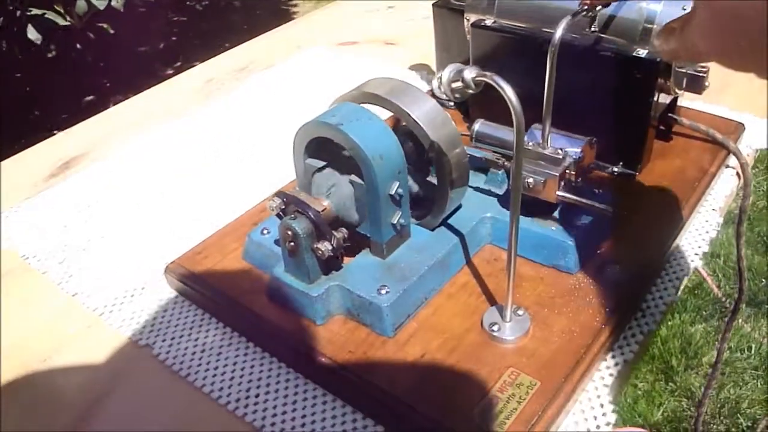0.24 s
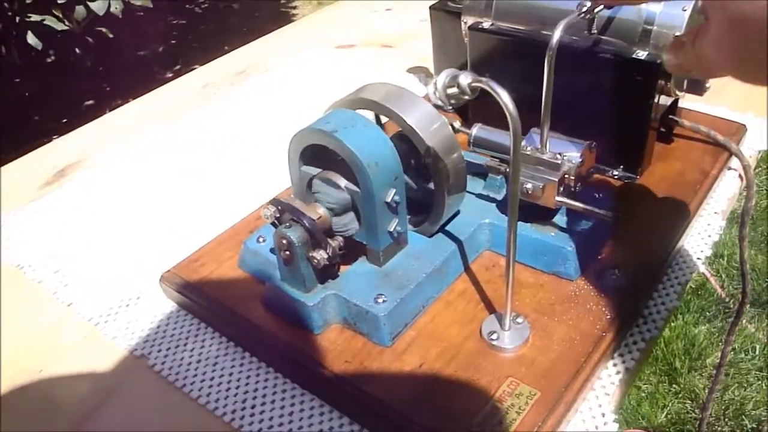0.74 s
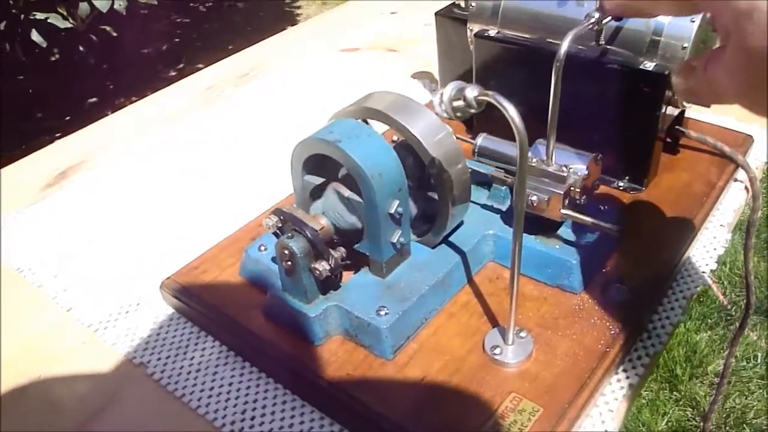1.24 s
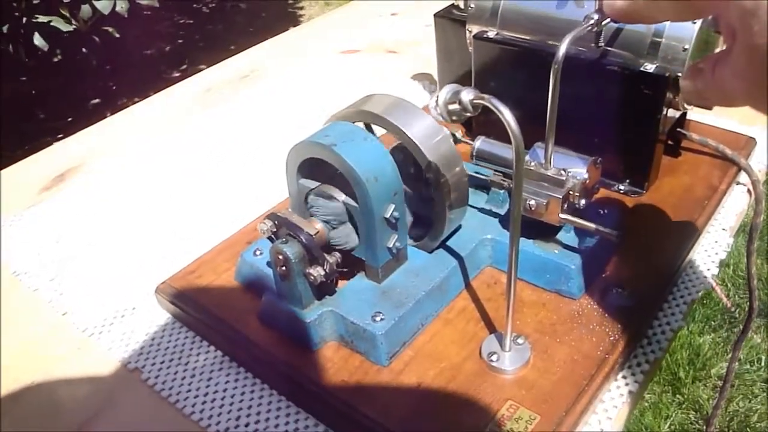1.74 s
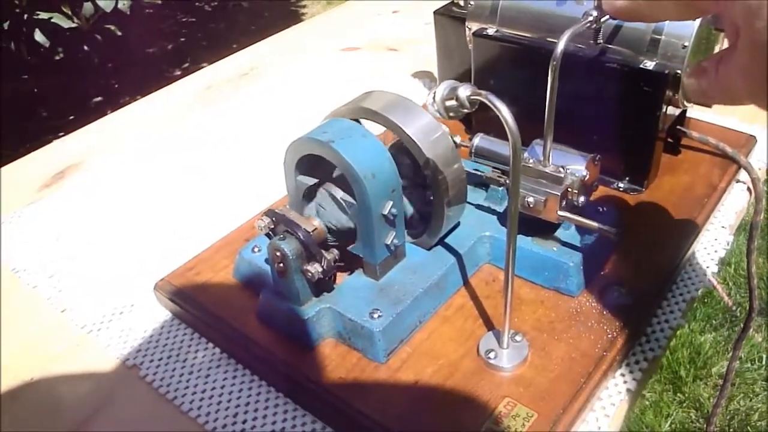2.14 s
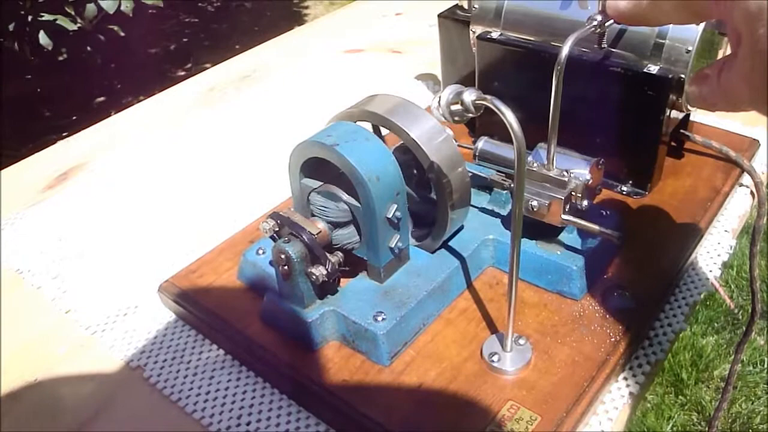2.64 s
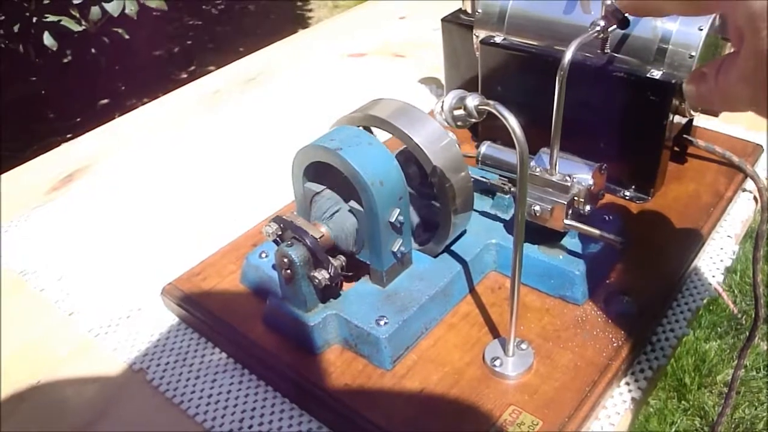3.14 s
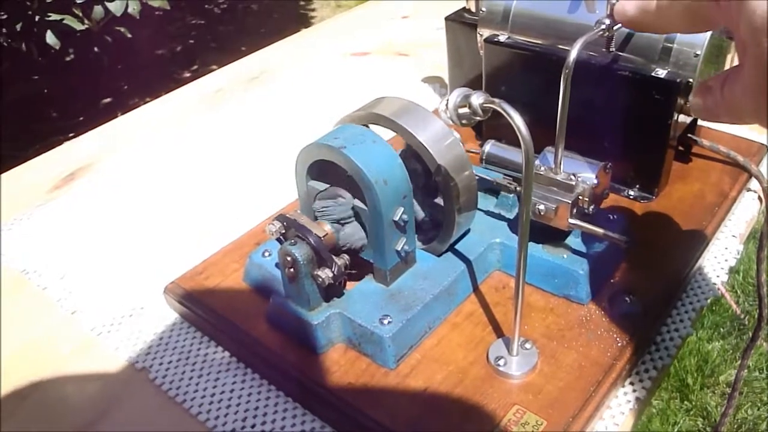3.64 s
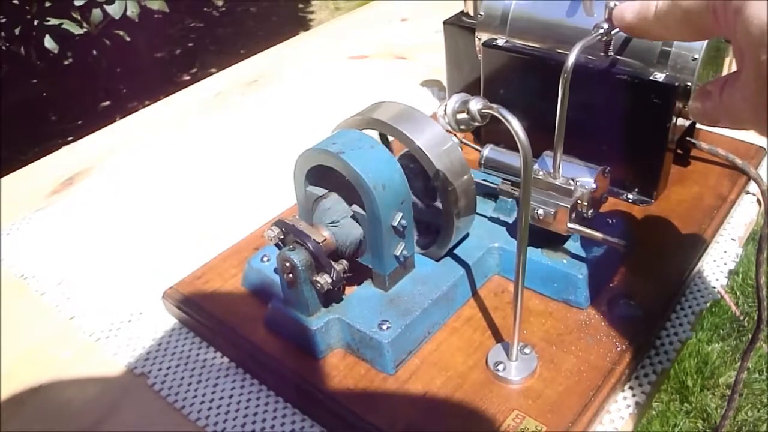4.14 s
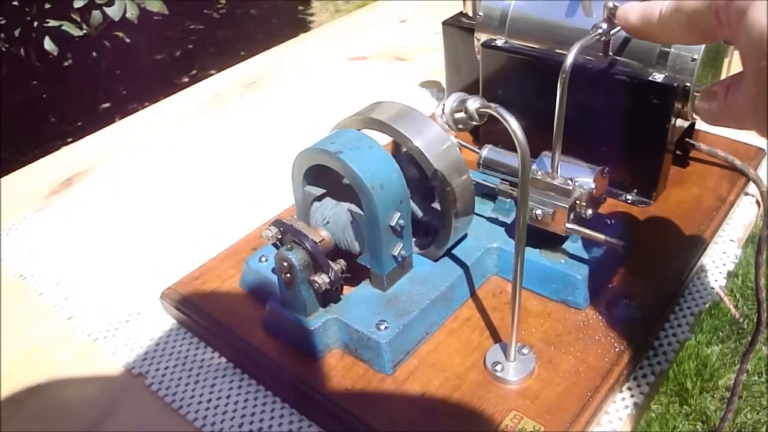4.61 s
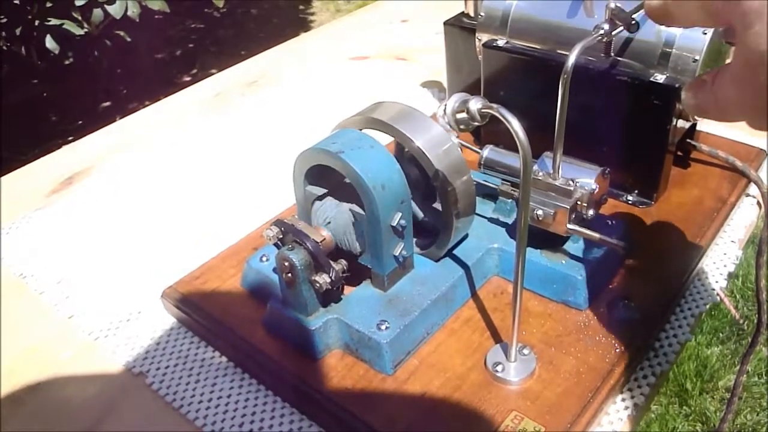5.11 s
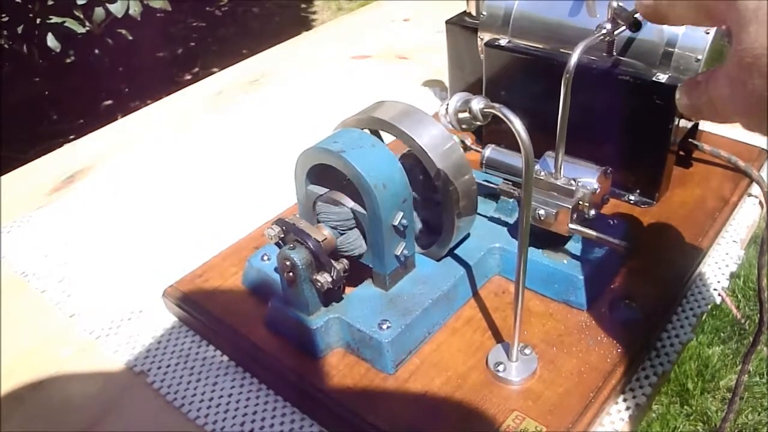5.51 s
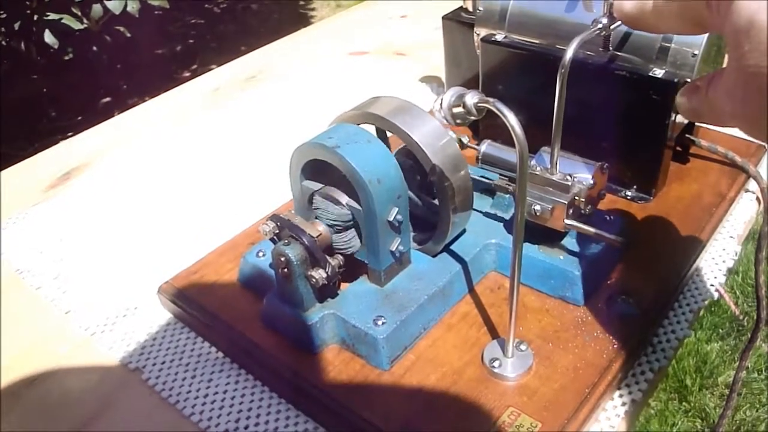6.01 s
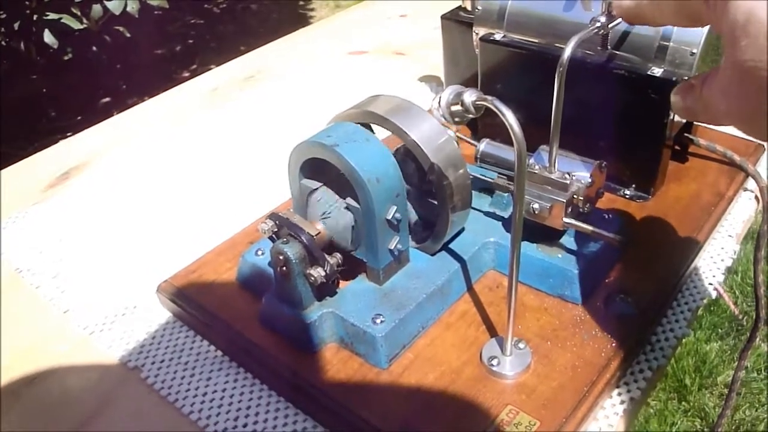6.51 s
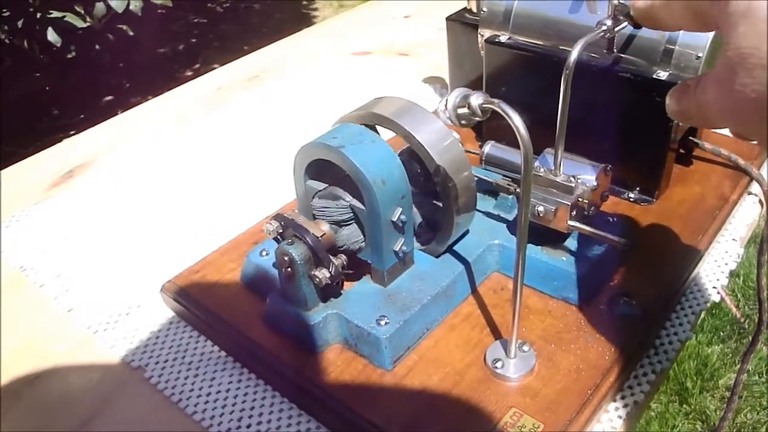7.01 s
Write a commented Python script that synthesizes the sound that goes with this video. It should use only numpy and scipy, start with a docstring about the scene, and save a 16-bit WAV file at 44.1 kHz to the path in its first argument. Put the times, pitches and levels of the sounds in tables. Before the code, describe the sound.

A small steam engine on a wooden board clatters fast with spitting exhaust puffs, then slows to separate knocks outdoors, ending in wind buffets.

```python
"""Outdoors, on a wooden board, a small double-acting steam engine runs down as the steam is shut off.
Two puffs a turn, each a spit and a blow-down, excite resonances of the exhaust pipe as shaped noise.
Slack in crank and valve gear knocks into the cast frame and board, heard as decaying modes.
Shaft and dynamo rumble over an outdoor wash, a boiler simmer and a far drone, all filtered noise.
A few wind buffets strike the microphone early on, and gusts with more buffets come at the end."""
import sys
import numpy as np
from scipy import signal
from scipy.fft import rfft, irfft
from scipy.io import wavfile

SR = 44100
rng = np.random.default_rng(int(sys.argv[2]) if len(sys.argv) > 2 else 0)


def wav_record(signal):
    """Record a signal, one row per channel, as 16-bit PCM in the file named by sys.argv[1]."""
    frames = np.transpose(np.atleast_2d(signal))
    bounded = np.clip(frames, -1, 1)
    # unit amplitude maps onto the largest positive 16-bit level
    quanta = np.round(bounded * 32767).astype(np.int16)
    wavfile.write(sys.argv[1], SR, quanta)


N = 320166  # samples
TIME = np.arange(N) / SR  # seconds


def amp(db):
    """Logarithmic level: decibels to an amplitude ratio."""
    return 10 ** (np.asarray(db) / 20)


def evened(x):
    """Normalisation to a root mean square of 1."""
    return x / np.sqrt(np.mean(x ** 2) + 1e-20)


def curve(rows):
    """Envelope: gain interpolated in decibels between the rows of a level table."""
    seconds, db = np.transpose(rows)
    return amp(np.interp(TIME, seconds, db))


def row_at(rows, s):
    """Linear interpolation: the columns of a control table at one moment."""
    times, *columns = np.transpose(rows)
    return np.array([np.interp(s, times, column) for column in columns])


def add(mix, s, sound):
    """Superposition: adds a sound to the mix from s seconds on."""
    part = mix[max(round(s * SR), 0):][:len(sound)]
    part += sound[:len(part)]


def coloured(gain):
    """Spectral shaping: noise of rms 1 with the given gain(Hz)."""
    spectrum = rfft(rng.standard_normal(N))
    return evened(irfft(spectrum * gain(np.fft.rfftfreq(N, 1 / SR)), N))


def shaped(points):
    """Spectral shaping: noise with a spectrum table, interpolated over log frequency."""
    hz, db = np.transpose(points)
    return coloured(lambda f: amp(np.interp(np.log(f + 1), np.log(hz + 1), db)))


def pipe(modes):
    """Resonance: noise through a sum of steep peaks."""
    return coloured(lambda f: sum(amp(db) / (1 + (2 * (f - hz) / width) ** 2) for hz, width, db in modes))


def flutter(hz, depth_db):
    """Amplitude modulation: random level changes, mostly below hz, with an rms of depth_db."""
    return amp(depth_db * coloured(lambda f: 1 / (1 + (f / hz) ** 4)))


def ring(modes, t):
    """Modal decay: a sum of damped sines; every blow lands differently and weights them anew."""
    hz, db, t60 = np.transpose(modes)[:, :, None]
    chance = rng.standard_normal((len(modes), 2))
    hz = hz * (1 + .006 * chance[:, :1])
    db = db + 1.5 * chance[:, 1:]
    x = (amp(db - 60 * t / t60) * np.sin(2 * np.pi * hz * t)).sum(0)
    return x / amp(db).sum()


# Modes of the wooden board, then lower and upper modes of the cast frame, also rung by the knocks.
# Each row: nominal frequency in Hz, relative level in dB, 60 dB decay time in seconds.
BOARD_MODES = [(444, -9.5, 0.038), (544, 1.5, 0.084), (601.6, -1.5, 0.18), (704, -1.5, 0.035)]
FRAME_LOW_MODES = [(744, -12, 0.099), (859, 1.5, 0.083), (888, 3, 0.03), (1026, 1, 0.051),
                   (1070, -11, 0.12), (1170, -10, 0.079)]
FRAME_HIGH_MODES = [(1302.5, -7.5, 0.12), (1386, 2.5, 0.037), (1494, -1.5, 0.084), (1714, -5, 0.046),
                    (1966, -18.5, 0.14), (2042, -1, 0.044), (2992, -7.5, 0.041)]
# Rumble of shaft and dynamo bearings. Each row: time in seconds, relative level in dB.
RUMBLE_LEVEL = [(0, -33), (.44, -52), (1.15, -53), (1.8, -35), (2.1, -45.5), (2.93, -32), (4.5, -38.5),
                (4.95, -36), (6.75, -52)]


def rumble():
    """Forced vibration: bearing roughness keeps the board and frame modes humming."""
    all_modes = BOARD_MODES + FRAME_LOW_MODES + FRAME_HIGH_MODES
    modes = [(hz, 4.3 / t60, db) for hz, db, t60 in all_modes]  # fast decay gives a wide peak

    def response(f):
        power = sum(amp(2 * db) / (1 + (2 * (f - hz) / width) ** 2) for hz, width, db in modes)
        return np.sqrt(power) * f / (f + 600)

    return curve(RUMBLE_LEVEL) * amp(-8) * flutter(40, 3.5) * coloured(response)


# Spectrum of open air and boiler simmer. Each row: frequency in Hz, relative density in dB per Hz.
AIR_SPECTRUM = [(260, -18), (450, -6.5), (700, -2.5), (830, 1.5), (1150, -5.5), (1700, -10), (3200, -10),
                (3850, -16), (4600, -14), (5300, -15.5), (5750, -18), (6400, -12), (8500, -17.5),
                (11000, -16)]
# Its course. Each row: time in seconds, relative level in dB.
WASH_LEVEL = [(0, -31), (.28, -34.5), (1.9, -33), (3.74, -35.5), (4.55, -33.5), (7.26, -35.5)]
# Spectrum of a distant low drone. Each row: frequency in Hz, relative density in dB per Hz.
DRONE_SPECTRUM = [(18, -51), (30, -14), (96, -10.5), (172, -9.5), (208, -4.5), (328, -6.5), (450, -9),
                  (580, -23), (990, -120)]
# A faint wavering hum. Each row: frequency in Hz, width in Hz, level in dB on the drone's level curve.
HUM_BANDS = [(100.3, 15, -6.5), (211, 15, -5)]
# Course of drone and hum. Each row: time in seconds, relative level in dB.
DRONE_LEVEL = [(0, -62.5), (.5, -70), (1.43, -62), (2.68, -64), (2.9, -58.5), (4.33, -60), (6.5, -60)]


def air():
    """Ambient noise: a near broadband wash, and a far drone with narrow hum bands."""
    wash = amp(-5.0) * curve(WASH_LEVEL) * flutter(8.7, 0.94) * shaped(AIR_SPECTRUM)
    hum = sum(amp(db) * pipe([(hz, width, 0)]) for hz, width, db in HUM_BANDS)
    drone = amp(5.0) * shaped(DRONE_SPECTRUM)
    return wash + curve(DRONE_LEVEL) * flutter(1.8, 1.4) * (drone + hum)


START_TURN = -.251  # crank angle at 0 s, in turns
# Crank speed. Each row: time in seconds, speed in turns per second.
CRANK_SPEED = [(0, 17.825), (.6, 16.285), (1.3, 13.898), (2.1, 11.846), (3, 10.261), (3.8, 9.261),
               (4.55, 8.77), (5.2, 7.286), (5.9, 5.712), (6.6, 3.294), (7.26, 2.25)]


def crank():
    """Kinematics: speed integrates to the crank angle in turns at every sample."""
    return START_TURN + np.cumsum(np.interp(TIME, *np.transpose(CRANK_SPEED))) / SR


# The two cylinder ends. Each row: port shuts at this share of the stroke, spit in the middle pipe
# modes in dB, blow-down in the middle in dB, blow-down in the upper in dB, squeeze before shutting
# in dB; all levels are relative.
CYLINDER_ENDS = [(.66, -5, 0.5, -5, -30), (.84, -12, -24, -5, 3.5)]


def port_power(stroke, end):
    """Gas release: power of spit, blow-down and squeeze at a port over one stroke of given seconds."""
    shut = CYLINDER_ENDS[end][0]
    t = np.arange(0, 1.2 * stroke, 1 / SR)
    share = t / stroke
    spit = ((t / 0.0036) * np.exp(1 - t / 0.0034)) ** 3
    closing = 1 / (1 + np.exp((share - shut) / 0.045))
    blow = np.minimum(t / 0.0019, 1) * amp(-14 * (share - 0.1)) * closing
    squeeze = np.exp(-((share - shut + 0.081) / 0.057) ** 2)  # trapped steam hisses past the valve
    return spit, blow, squeeze


# Exhaust pipe modes, lower, middle and upper.
# Each row: frequency in Hz, width in Hz, relative level in dB.
PIPE_LOW_MODES = [(5773, 540, 8), (6300, 700, -1)]
PIPE_MID_MODES = [(6680, 200, -9.5), (7130, 610, -4.5)]
PIPE_TOP_MODES = [(9100, 540, -19), (9810, 127, -4.5), (10375, 270, -4), (10835, 180, -2)]
FAR_PORT_TURN, STEAM_TURNS = .526, 66  # turn at which the second port opens; turns under steam
# Exhaust of each cylinder end as the steam falls. Each row: time in seconds, spit in the upper pipe
# modes in dB, spit in the lower in dB, blow-down in dB; all levels are relative.
STEAM_LEVEL = [
    [(0, -32.5, -34, -36.5), (.6, -36, -35.5, -37.5), (1.2, -42, -36, -38), (1.8, -32, -30.5, -37.5),
     (2.5, -35.5, -30, -38.5), (3.3, -29.5, -28, -39), (4.3, -31, -28.5, -40.5), (4.7, -35, -29.5, -42),
     (5, -48, -40, -44.5), (5.9, -55, -40, -53)],
    [(0, -33, -45, -39), (.5, -31, -31, -38.5), (.9, -31.5, -37, -39), (1.3, -29.5, -33, -38.5),
     (2.2, -25.5, -31.5, -40.5), (2.9, -30, -29.5, -40.5), (3.7, -28, -29.5, -43), (4.4, -24, -30.5, -44),
     (4.95, -31, -34.5, -47), (5.6, -29.5, -37, -50), (6, -37, -36, -58)],
]
# Random spread of those three levels from puff to puff, in dB rms.
STEAM_SPREAD_DB = (1.6, .8, .5)


def exhaust():
    """Jet noise in a resonator: the port cracks open with a spit, blows down, then shuts."""
    low, mid, top = power = np.zeros((3, N))
    opening = (np.arange(STEAM_TURNS)[:, None] + [0, FAR_PORT_TURN]).ravel()
    starts = np.interp(opening, crank(), TIME)
    strokes = np.gradient(starts)
    scatter = rng.standard_normal((len(starts), 3)) * STEAM_SPREAD_DB
    for k, (s, stroke) in enumerate(zip(starts, strokes)):
        end = k % 2
        top_db, low_db, blow_db = row_at(STEAM_LEVEL[end], s) + scatter[k]
        _, mid_spit_db, mid_blow_db, top_blow_db, squeeze_db = CYLINDER_ENDS[end]
        spit, blow, squeeze = port_power(stroke, end)
        # levels are doubled because these envelopes are powers
        add(low, s, amp(2 * low_db) * spit + amp(2 * blow_db + 3.0) * blow)
        mid_spit = amp(2 * (low_db + mid_spit_db)) * spit
        add(mid, s + .0015, mid_spit + amp(2 * (blow_db + mid_blow_db)) * blow)
        top_flow = amp(2 * top_blow_db) * blow + amp(2 * squeeze_db) * squeeze
        add(top, s, amp(2 * top_db) * spit + amp(2 * blow_db) * top_flow)
    banks = (PIPE_LOW_MODES, PIPE_MID_MODES, PIPE_TOP_MODES)
    tones = sum(np.sqrt(p) * pipe(modes) * flutter(200, 1.8) for p, modes in zip(power, banks))
    hiss = coloured(lambda f: f / (f + 1500))  # broad, outside the modes
    return tones + amp(-8.5) * np.sqrt(power.sum(0)) * hiss


# Gusts on the microphone. Each row: time in seconds, relative level in dB.
GUST_LEVEL = [(6.5, -61), (6.6, -33.5), (6.636, -54), (6.734, -32), (6.818, -57), (6.906, -38),
              (7.016, -47), (7.068, -44), (7.168, -49.5), (7.26, -47)]
# Single buffets. Each row: start in seconds, relative peak level in dB, nominal frequency in Hz.
WIND_BUFFETS = [(0.021, -44, 104), (0.375, -30.5, 190), (0.609, -42, 299), (6.589, -36, 236),
                (6.675, -28.5, 141), (6.73, -21, 182), (6.775, -34, 168), (6.853, -33, 145),
                (6.897, -27, 151), (6.932, -26, 221), (6.948, -35, 132), (6.965, -28.5, 260),
                (7.054, -35.5, 161), (7.069, -35, 220), (7.103, -36.5, 219), (7.221, -38, 230)]


def wind():
    """Turbulent pressure: lumpy low noise in the gusts, and single buffets of a cycle or two."""
    blowing = np.clip((TIME - GUST_LEVEL[0][0]) / 0.044, 0, 1)
    swings = coloured(lambda f: f ** 2 / (f ** 2 + 90 ** 2) / (1 + (f / 220) ** 2))
    out = amp(-4.5) * curve(GUST_LEVEL) * blowing * flutter(35, 2.5) * swings
    for s, peak_db, hz in WIND_BUFFETS:
        u = np.arange(0, 3 / hz, 1 / SR) * hz  # time in cycles
        # sudden push, slower rebound
        push = np.sin(2 * np.pi * u ** .8) * np.minimum(u / .1, 1) * np.exp(-(u / 1.3) ** 2)
        snap = .5 * np.sin(5 * np.pi * u) * np.exp(-u / 0.29)  # the membrane snaps at the front
        add(out, s, -amp(peak_db) * (push + snap))
    return out


def rattle(shake):
    """Amplitude-modulated noise: loose parts rattle on after a blow."""
    return shake * flutter(270, 2.36) * coloured(lambda f: 1 / (1 + ((f - 1100) / 750) ** 2))


# Knocks of the gear. Each row: time in seconds, relative peak level in dB.
GEAR_KNOCKS = [(.023, -11), (.055, -19.5), (.081, -12), (.113, -19), (.14, -10.5), (.17, -16), (.196, -12),
               (.231, -16.5), (.256, -13), (.289, -19), (.313, -13.5), (.349, -17.5), (.375, -13),
               (.412, -20), (.435, -13), (.47, -17.5), (.497, -11), (.532, -16), (.558, -11), (.591, -13.5),
               (.619, -10.5), (.653, -13.5), (.682, -9), (.717, -13.5), (.748, -9), (.779, -15.5),
               (.811, -14), (.845, -14), (.871, -10), (.909, -13.5), (.94, -7.5), (.977, -14), (1.01, -8.5),
               (1.042, -12.5), (1.074, -7), (1.111, -13), (1.142, -9.5), (1.182, -12.5), (1.213, -8.5),
               (1.25, -13), (1.284, -11.5), (1.321, -12), (1.356, -10), (1.394, -11.5), (1.431, -12.5),
               (1.467, -11), (1.502, -13.5), (1.542, -10), (1.577, -13.5), (1.616, -13), (1.654, -10),
               (1.695, -9.5), (1.729, -9), (1.773, -12), (1.808, -10.5), (1.851, -11), (1.888, -9.5),
               (1.932, -12), (1.97, -12), (2.013, -11), (2.049, -13.5), (2.104, -14.5), (2.134, -15.5),
               (2.178, -16.5), (2.215, -15), (2.245, -19), (2.267, -12.5), (2.302, -16), (2.35, -15.5),
               (2.361, -20.5), (2.421, -29), (2.437, -17.5), (2.448, -18.5), (2.527, -26), (2.539, -12),
               (2.599, -25), (2.615, -15.5), (2.629, -15), (2.693, -26), (2.706, -17), (2.787, -25),
               (2.799, -19), (2.815, -18.5), (2.845, -23), (2.894, -15.5), (2.909, -21), (2.937, -13),
               (2.989, -15), (3.034, -19.5), (3.068, -22), (3.186, -12), (3.288, -13.5), (3.389, -11.5),
               (3.476, -31), (3.489, -8.5), (3.596, -9), (3.679, -30), (3.701, -12.5), (3.808, -10.5),
               (3.853, -23.5), (3.915, -10), (3.961, -20), (4.025, -9.5), (4.073, -20.5), (4.134, -13.5),
               (4.18, -21.5), (4.245, -9), (4.296, -22.5), (4.357, -8), (4.406, -21), (4.472, -13),
               (4.521, -21.5), (4.591, -16), (4.733, -24), (4.784, -13.5), (4.849, -15), (4.911, -7),
               (4.978, -11), (5.045, -6.5), (5.178, -7.5), (5.296, -26), (5.316, -6), (5.362, -24),
               (5.461, -11.5), (5.537, -23), (5.611, -9.5), (5.691, -16.5), (5.764, -12.5), (5.855, -26),
               (5.893, -17.5), (5.965, -11.5), (6.068, -12.5), (6.16, -19), (6.263, -8), (6.329, -29),
               (6.379, -16), (6.439, -28.5), (6.501, -6), (6.653, -20), (6.816, -8.5), (6.899, -26),
               (7.17, -18.5), (7.23, -27.5)]
# Short clack of the parts, lower and upper modes, then the hard edge.
# Each row: nominal frequency in Hz, relative level in dB, 60 dB decay time in seconds.
CLACK_LOW_MODES = [(980, 2, 0.0091)]
CLACK_HIGH_MODES = [(1408, 14.5, 0.0064), (1880, 1, 0.0097), (2162, -3, 0.0087)]
EDGE_MODES = [(2444, 13.5, 0.0025), (2994, 10.5, 0.0072), (3435, -2, 0.02), (3820, -4, 0.0071),
              (4420, -1.5, 0.012), (5050, -0.5, 0.0075)]
# A low board mode, heard only at first. The row: nominal frequency in Hz, 60 dB decay time in
# seconds, level in dB against the thud, last moment in seconds.
BOARD_LOW_MODE = (380, .13, -11, .21)
# Knock colour in the first and second half of the turn. Each row: time in seconds, board thud in dB,
# upper clack and frame in dB, hard edge in dB; all levels are relative.
KNOCK_COLOUR = [
    [(0, -12, -9, -18), (.4, -12.5, -4.5, -15.5), (.6, -31, -11, -20.5), (1.1, -26, -8.5, -16.5),
     (1.4, -42, -2, -12.5), (1.8, -15.5, -8, -13.5), (2.3, -12.5, -5, -17), (3, -14, -10.5, -32),
     (3.9, -1.5, -3, -11), (4.55, -1, -7, -13), (4.8, -8, -10, -27), (4.9, -11.5, -8, -11),
     (5.15, -10, -7.5, -22), (5.3, -12.5, -10, -12), (5.5, -6.5, -13.5, -33), (5.9, -11.5, -8, -24),
     (6.4, -20, -23, -33)],
    [(0, -13, -1, -7.5), (.5, -20, -7.5, -14), (1, -14, -6.5, -12.5), (1.5, -27, -9.5, -14),
     (1.9, -15, -8, -15), (2.3, -18, -8.5, -17.5), (2.85, -9, -8.5, -35), (3.5, -16.5, -8.5, -19.5),
     (3.95, -13.5, -5.5, -17), (4.4, -18.5, -4.5, -18.5), (5, -19, -10, -21), (5.9, -20, -10, -25),
     (6.1, -18, -1.5, -16), (6.9, -18, -5, -16)],
]
# Random spread of those three levels from knock to knock, in dB rms.
COLOUR_SPREAD_DB = (1.5, .8, 1.2)
# Crank angles that bound the second half: start in turns, end in turns.
SECOND_HALF = (.51, 1.06)
CLACK_LEAD_S = .0008  # the clack leads frame and board
EDGE_LAG_S = .0006  # the hard edge meets after the oil film is squeezed out
ECHO_S, ECHO_GAIN = .0024, -.85  # nominal: the clack returns inverted from the board


def knocks():
    """Impact excitation: a clack of the parts, a weaker frame ring and a slower thud of the board."""
    out, shake = np.zeros((2, N))
    t = np.arange(0, .16, 1 / SR)
    short = t[t < .03]
    contact = (1 - np.exp(-short / 0.001)) ** 2  # the oil film spreads the blow
    swing = (1 - np.exp(-t / 0.0021)) ** 2  # frame and board take a moment to swing
    low_hz, low_t60, low_db, low_until = BOARD_LOW_MODE
    angle, (half, full) = crank(), SECOND_HALF
    for s, peak_db in GEAR_KNOCKS:
        second = (angle[round(s * SR)] - half) % 1 < full - half
        scatter = rng.standard_normal(3) * COLOUR_SPREAD_DB
        thud_db, upper_db, edge_db = row_at(KNOCK_COLOUR[int(second)], s) + scatter
        delay, echo, grit = rng.uniform((.98, .8, .3), (1.02, 1.1, 1))

        parts = ring(CLACK_LOW_MODES, short) + amp(upper_db + 12.0) * ring(CLACK_HIGH_MODES, short)
        clack = amp(peak_db + 3.5) * contact * parts
        edge_onset = 1 - np.exp(-short / .0001)
        tick = amp(peak_db + edge_db + 14.0) * ring(EDGE_MODES, short) * edge_onset
        clack_s = s - CLACK_LEAD_S
        add(out, clack_s, clack)
        add(out, clack_s + EDGE_LAG_S, tick)
        add(out, clack_s + ECHO_S * delay, ECHO_GAIN * echo * clack)
        add(out, s + ECHO_S * grit, .5 * grit * tick)  # the edge chatters once more

        add(shake, s, amp(peak_db - 18.0 - 60 * t / 0.066) * swing)
        frame = amp(-6) * ring(FRAME_LOW_MODES, t) + amp(upper_db + 3.0) * ring(FRAME_HIGH_MODES, t)
        low_board = (s < low_until) * amp(low_db) * ring([(low_hz, 0, low_t60)], t)
        board = ring(BOARD_MODES, t) + low_board
        add(out, s, amp(peak_db) * swing * (frame + amp(thud_db + 5.5) * board))
    return out + rattle(shake)


# A loose part pings now and then.
# Each row: start in seconds, relative peak level in dB, nominal frequency in Hz.
LOOSE_PINGS = [(1.777, -22.5, 2710), (1.8574, -31, 2740), (1.9315, -38, 2700), (2.1034, -37, 2570),
               (2.537, -30, 2600), (3.1042, -30.5, 2600), (4.8554, -28, 2730)]


def pings():
    """Free vibration: a loose part rings in two quickly damped, inharmonic modes."""
    out, t = np.zeros(N), np.arange(0, .16, 1 / SR)
    t = t[t < .03]
    for s, peak_db, hz in LOOSE_PINGS:
        onset = 1 - np.exp(-t / 0.00069)
        add(out, s, amp(peak_db + 9) * onset * ring([(hz, 0, .02), (1.9 * hz, -8, .01)], t))
    return out


def gear():
    """Radiation efficiency: knocks and pings lose their bass, as the parts are too small to radiate it."""
    radiation = signal.butter(4, 400, "highpass", fs=SR, output="sos")
    return signal.sosfilt(radiation, knocks() + pings())


def scene():
    """Superposition: all sources sum into one channel."""
    return (rumble() + air() + exhaust() + wind() + gear())[None]


def record(dry):
    """Band limiting: a high-pass thins the bass and a steep low-pass ends the treble at 11080 Hz."""
    thin = signal.sosfilt(signal.butter(2, 70, "highpass", fs=SR, output="sos"), dry)
    low_pass = signal.firwin(401, 11080, window=("kaiser", 7), fs=SR)
    return signal.oaconvolve(thin, low_pass[None], "same")


dry = scene()
out = record(dry)
wav_record(out)
```